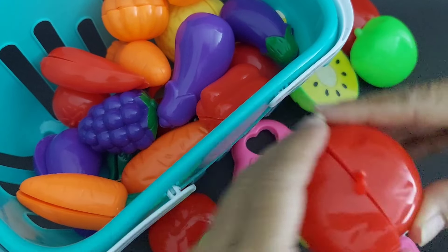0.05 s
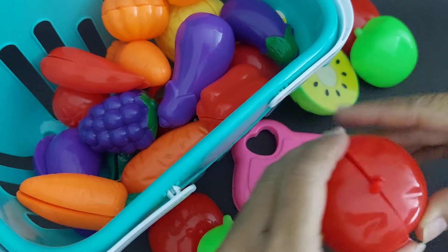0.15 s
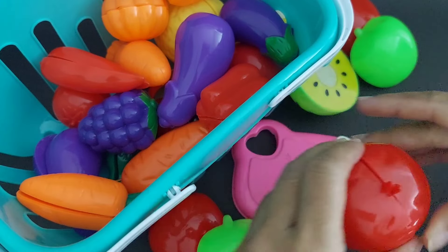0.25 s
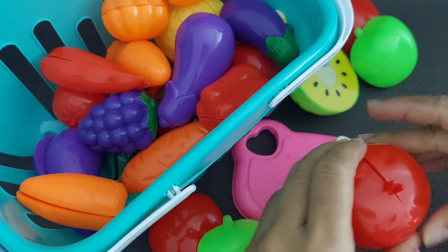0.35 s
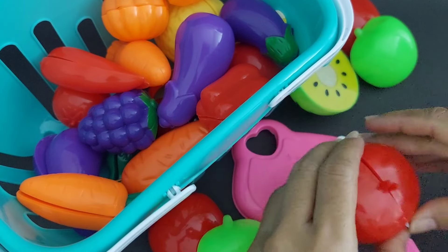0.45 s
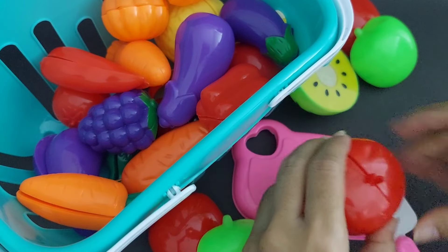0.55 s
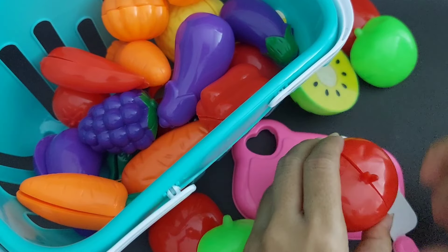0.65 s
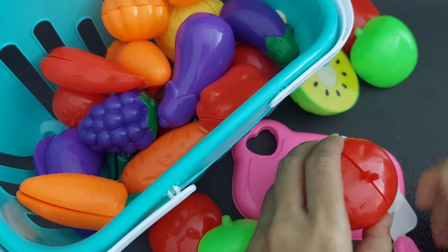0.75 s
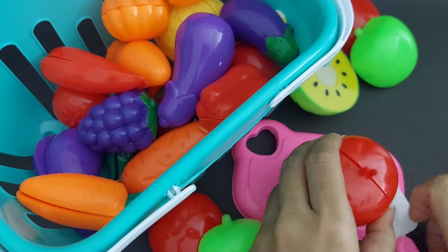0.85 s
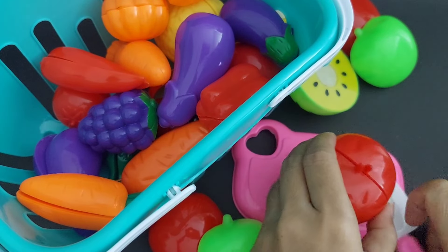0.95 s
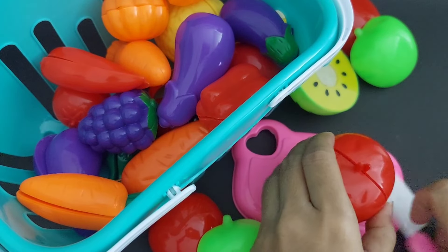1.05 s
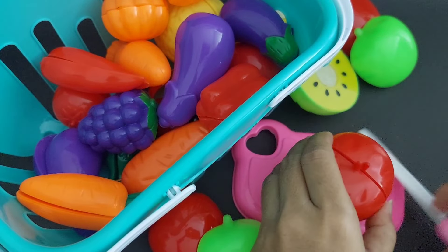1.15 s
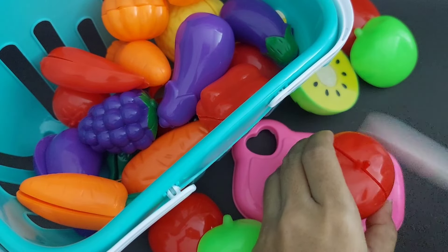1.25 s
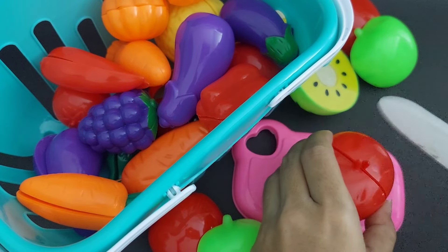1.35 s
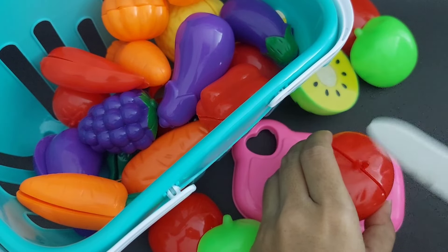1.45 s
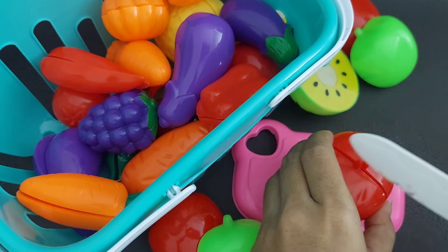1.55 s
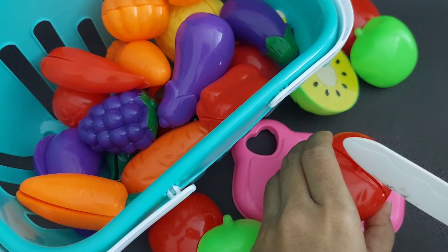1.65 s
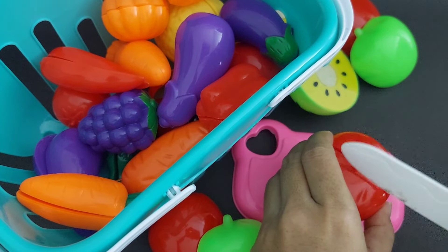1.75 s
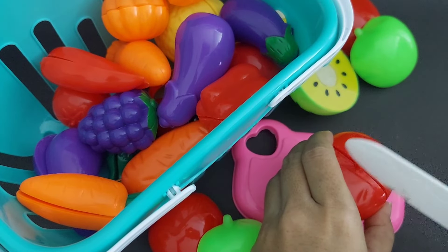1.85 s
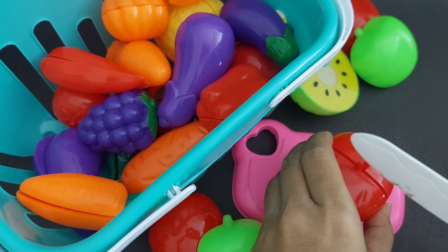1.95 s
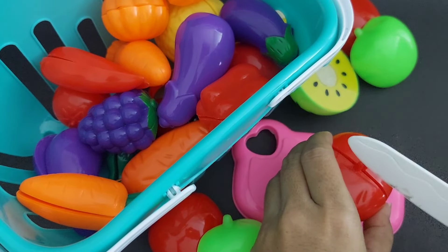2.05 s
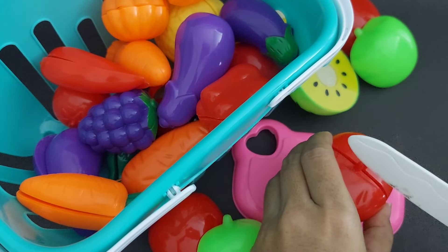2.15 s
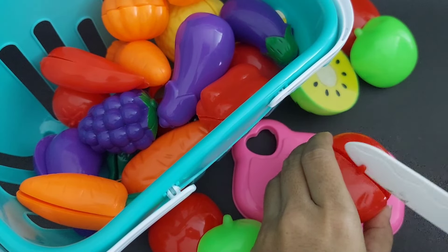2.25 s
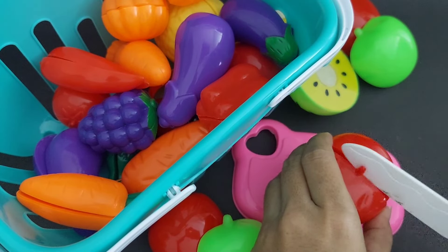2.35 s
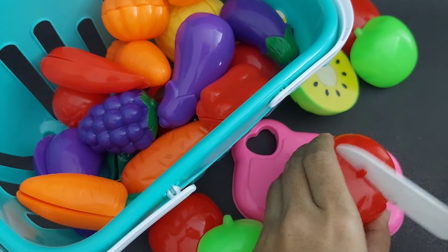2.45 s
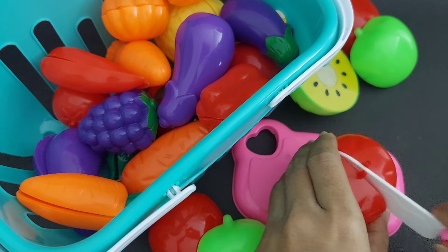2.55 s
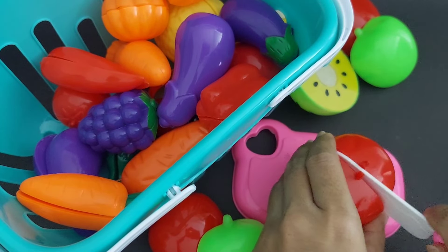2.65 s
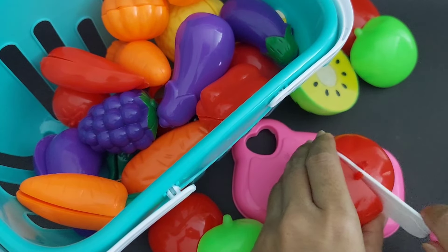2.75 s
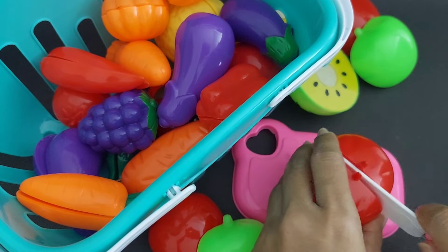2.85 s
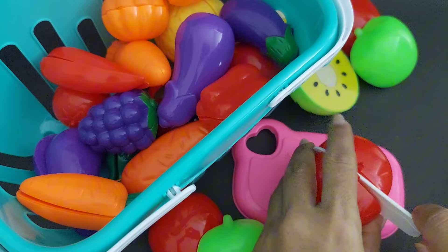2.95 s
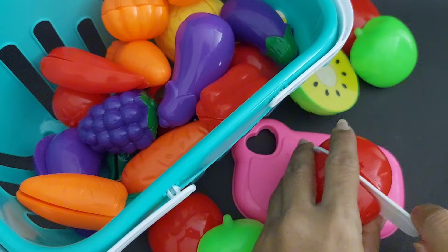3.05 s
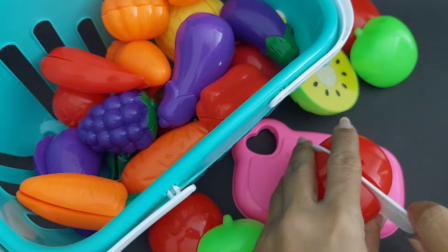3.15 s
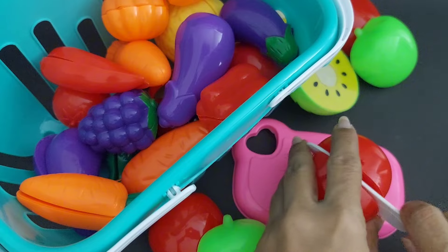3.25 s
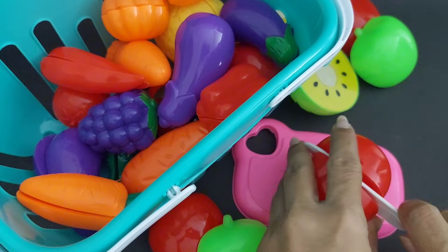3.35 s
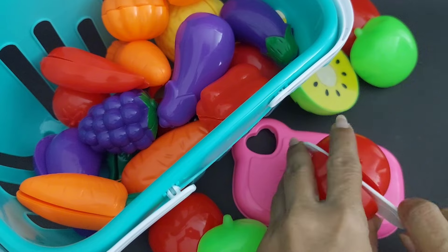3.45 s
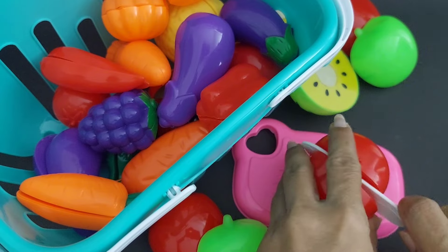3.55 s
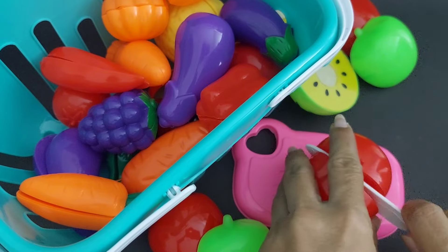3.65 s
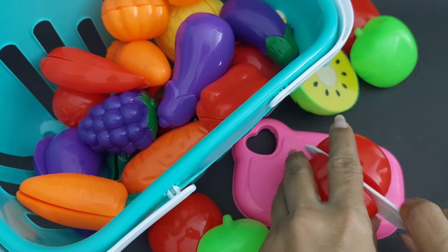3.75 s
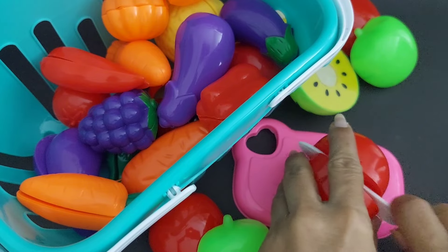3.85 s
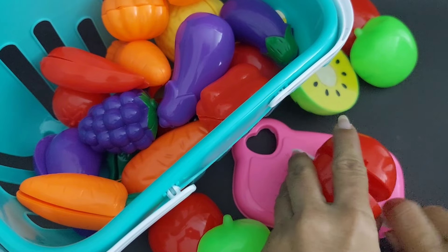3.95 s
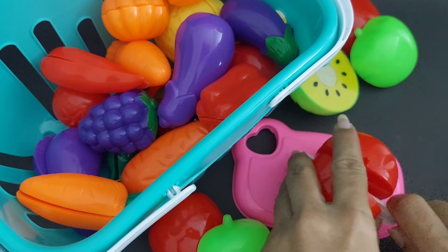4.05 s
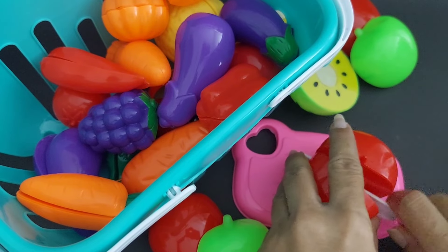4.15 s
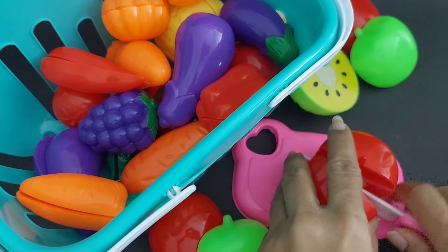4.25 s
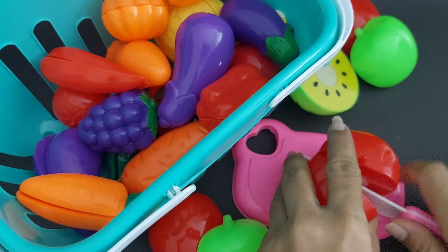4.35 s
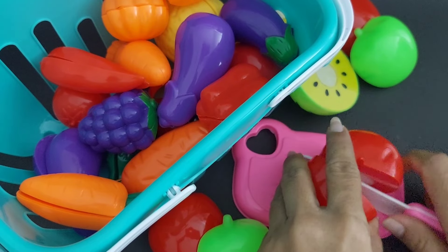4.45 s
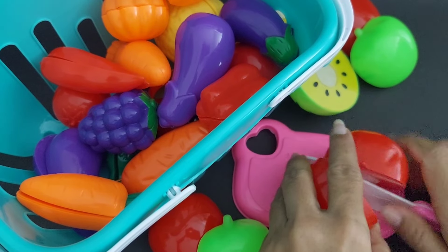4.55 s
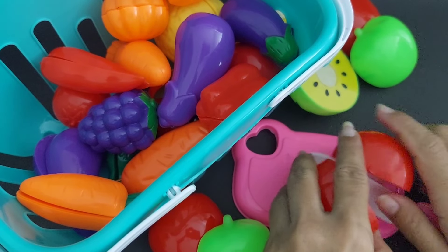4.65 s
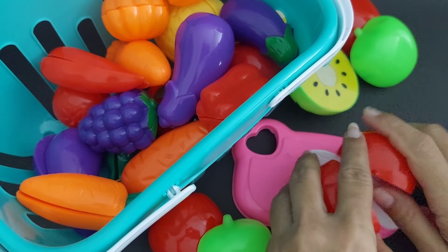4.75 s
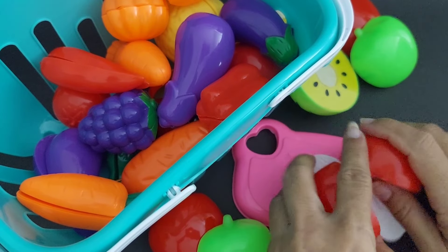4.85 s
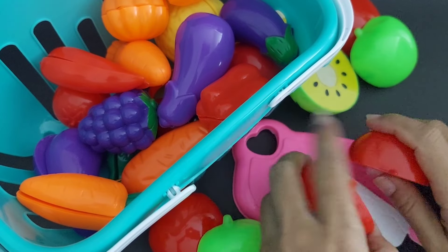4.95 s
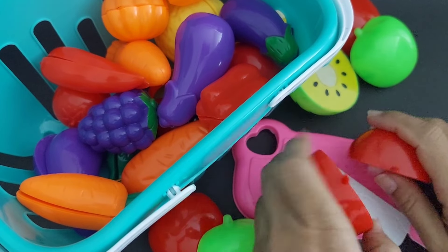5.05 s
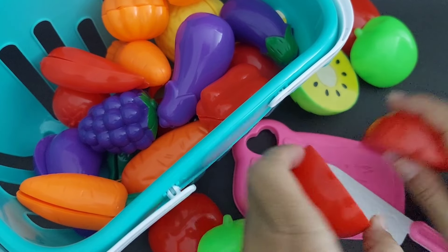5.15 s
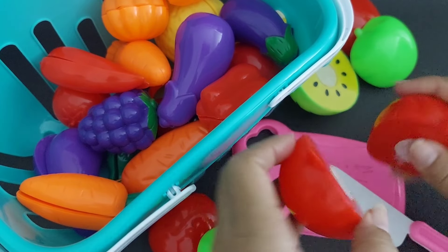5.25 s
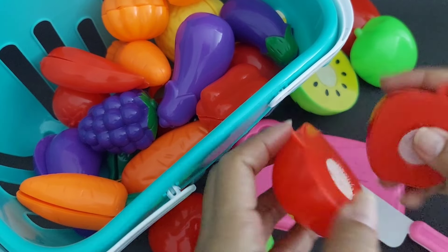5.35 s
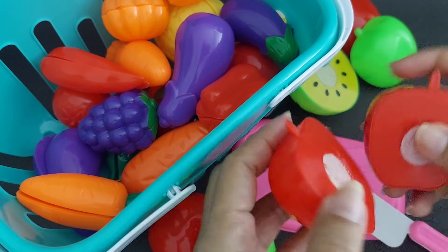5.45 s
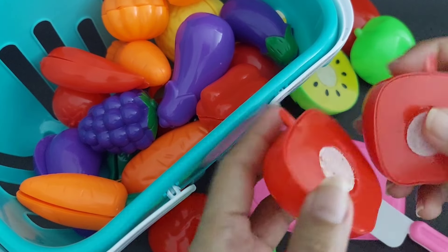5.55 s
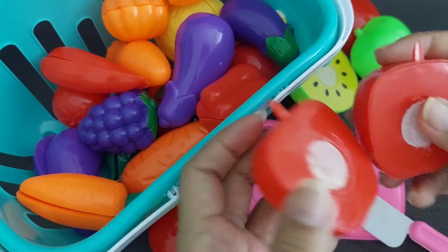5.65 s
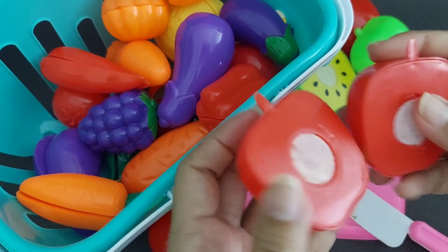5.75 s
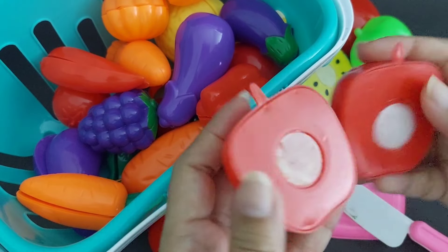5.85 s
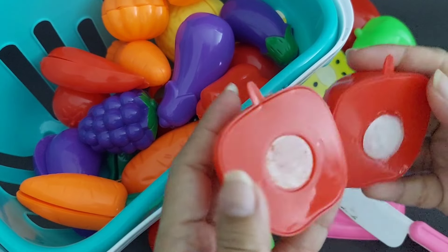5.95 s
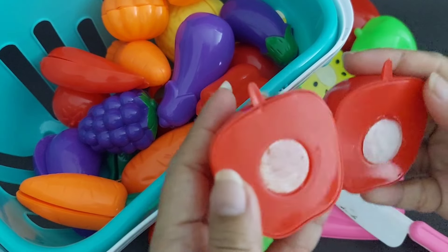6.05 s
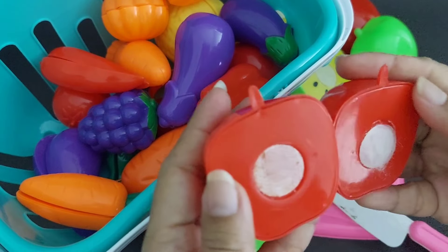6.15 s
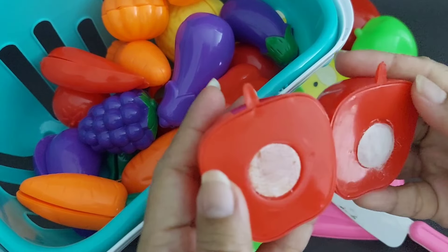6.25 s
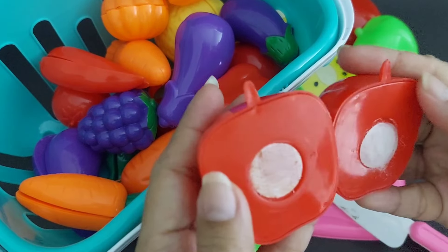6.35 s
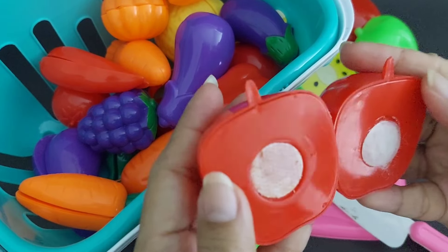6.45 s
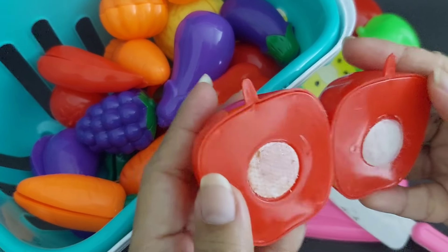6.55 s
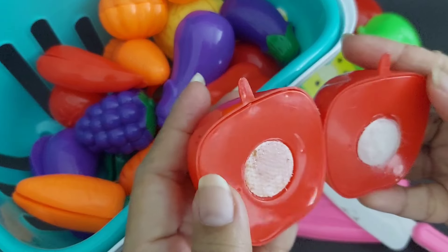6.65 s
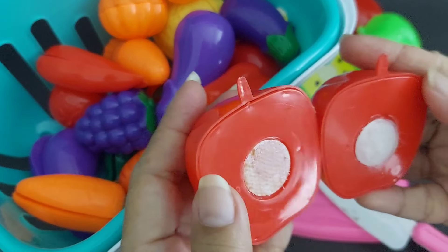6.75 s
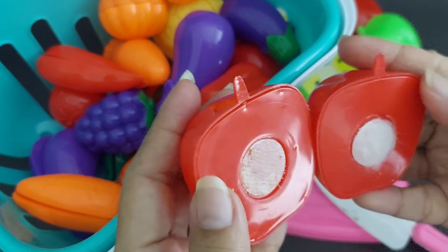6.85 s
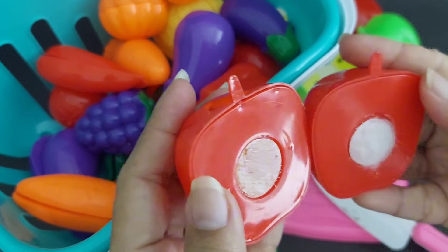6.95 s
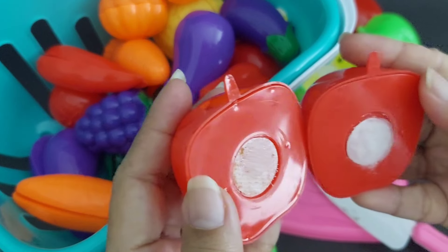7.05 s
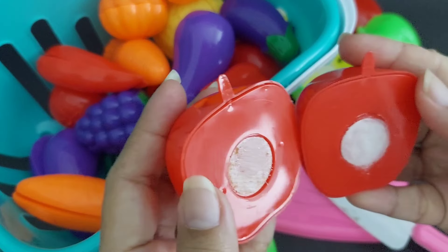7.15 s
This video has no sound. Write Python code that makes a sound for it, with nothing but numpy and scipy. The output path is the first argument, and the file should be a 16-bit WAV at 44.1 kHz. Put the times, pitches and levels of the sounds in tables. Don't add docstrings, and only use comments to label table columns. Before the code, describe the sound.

Light plastic ticks come first, followed by quiet knocks and soft rubs as a plastic blade is placed on a toy fruit. Dry snaps thicken into crackling and a short fierce rip, shaking the plastic board and table. The separated shells scrape with a falling hollow tone and clack twice, then only faint brushing, rumble and hiss remain. Heard close up in a small bare room.

```python
import sys
import numpy as np
from scipy import signal
from scipy.fft import rfft, irfft
from scipy.io import wavfile

SR = 44100
rng = np.random.default_rng(int(sys.argv[2]) if len(sys.argv) > 2 else 0)


def digitize_waveform(pressure):
    field = np.atleast_2d(pressure).T
    bounded = np.clip(field, -1, 1)
    quanta = np.round(bounded * 32767).astype(np.int16)
    wavfile.write(sys.argv[1], SR, quanta)


def volts_from_decibels(level):
    exponent = np.asarray(level, float) / 20
    return 10 ** exponent


N = 317512


def in_time(rows):
    s, *columns = np.transpose(rows)
    t = np.arange(N) / SR
    return np.array([np.interp(t, s, c, left=-150, right=-150) for c in columns])


def rms_one(x):
    return x / np.sqrt(np.mean(x ** 2) + 1e-20)


def wobble(hz):
    return rms_one(signal.sosfilt(signal.butter(2, hz, fs=SR, output="sos"), rng.standard_normal(N)))


def coloured(spectrum, alike):
    mid, side = rng.standard_normal((2, N))
    both = np.sqrt(1 + alike) * mid + np.sqrt(1 - alike) * side * [[1], [-1]]
    hz, level_db = np.transpose(spectrum)
    log_hz = np.log(np.fft.rfftfreq(N, 1 / SR) + 1)
    shape = volts_from_decibels(np.interp(log_hz, np.log(hz), level_db, left=-150, right=-150))
    return rms_one(irfft(rfft(both) * shape, N))


def bursts(times, gains, decay_s):
    marks = np.full((2, N), 1e-18)
    marks[:, np.round(np.array(times) * SR).astype(int)] = gains
    return signal.lfilter([1], [1, -np.exp(-1 / (decay_s * SR))], marks)


def swells(rows, longest_s):
    t = np.arange(0, N + 32, 32) / SR
    out = []
    for s, rise_s, fall_s, db, _ in rows:
        corners_s = [s - abs(rise_s), s, s + 5 * abs(fall_s)]
        out.append(np.interp(t, corners_s, [db - 14, db, db - 100], left=-150))
    return np.where(t > np.array(rows)[:, :1] + longest_s, -150, out)


def fine(coarse):
    return np.interp(np.arange(N) / 32, np.arange(len(coarse)), coarse)


def share(rows, kind):
    hollow_db = np.array(rows)[:, -1]
    wall_db, wall_share, pad_db, pad_share = kind
    return np.array([hollow_db, wall_db + wall_share * hollow_db, pad_db + pad_share * hollow_db, 0 * hollow_db])


# (start t/s, end t/s)
PAD_GIVES = (3.86, 3.92)


def body(x, modes, patchy_db=0):
    out, power = 0, 0
    apart = np.interp(np.arange(N) / SR, PAD_GIVES, [0, 1])
    for k, (hz, width_hz, level_db, apart_db) in enumerate(modes):
        r = np.exp(-np.pi * width_hz / SR)
        a = [1, -2 * r * np.cos(2 * np.pi * hz / SR), r * r]
        b = (1 - r * r) / 2 * np.array([1, 0, -1])
        wander = np.interp(np.arange(N), np.arange(0, N + 1200, 1200), rng.standard_normal(N // 1200 + 2))
        struck = x * volts_from_decibels(level_db + apart * (apart_db - level_db) + patchy_db * wander) + 1e-18
        out = out + (-1) ** k * signal.lfilter(b, a, struck)
        power += volts_from_decibels(level_db) ** 2 * np.pi * width_hz / SR
    return out / np.sqrt(power)


def scrapes(rows, width_hz, alike):
    longest_s = 0.28
    swing = signal.sosfilt(signal.butter(2, width_hz / 2, fs=SR, output="sos"), rng.standard_normal((2, 2, N)))
    one, other = rms_one(swing[0]) + 1j * rms_one(swing[1])
    both, out = np.array([one, alike * one + (1 - alike) * other]), np.zeros((2, N))
    for row, level_db in zip(rows, swells(rows, longest_s)):
        a = max(int((row[0] - abs(row[1])) * SR) - 64, 0)
        b = min(int((row[0] + longest_s) * SR) + 64, N)
        tone = np.exp(2j * np.pi * row[-1] * np.arange(a, b) / SR)
        out[:, a:b] += volts_from_decibels(fine(level_db)[a:b]) * np.real(both[:, a:b] * tone)
    return out


# (f/Hz, level/dB per Hz)
RUMBLE_SPECTRUM = [(15, -66), (25, -36.5), (48, -23.5), (70, -4), (135, 0.5), (200, -12.5), (229, -12.5),
                   (257, -18.5), (287, -16), (390, -29), (700, -40), (910, -69), (1540, -120)]
# (t/s, level/dB, left over right
# level/dB)
RUMBLE_LEVEL = [(0.0, -65.5, 7), (1.6, -68.5, 8.5), (2.26, -65.5, 7), (2.42, -65.5, 9), (3.83, -65, 3.5),
                (4.02, -63, 2.4), (4.33, -73, 8), (4.91, -60.5, 8), (5.31, -71.5, 8.5), (6.1, -69.5, 9),
                (7.2, -71.5, 7.5)]
# (f/Hz, level/dB per Hz)
HISS_SPECTRUM = [(290, -32.5), (500, -5), (960, -6.5), (1320, -8.5), (1420, -8.5), (1770, -10.5),
                 (4730, -18.5), (5470, -17), (7860, -5.5), (8700, -15), (10500, -15.5), (13800, -23),
                 (16900, -21.5)]


def floor():
    level_db, left_db = in_time(RUMBLE_LEVEL)
    lumps = volts_from_decibels(level_db + 3.0 + 0.74 * wobble(6))
    rumble = coloured(RUMBLE_SPECTRUM, alike=0.6) * lumps * volts_from_decibels(left_db * [[.5], [-.5]])
    hiss = volts_from_decibels(-81.5) * coloured(HISS_SPECTRUM, alike=0.072) * volts_from_decibels([[1.5], [-1.5]])
    return rumble + hiss


# (t/s, crack level/dB, shell above crack level/dB)
FINGER_TICKS = [(0.154, -40, -9.5), (0.17, -49.5, -9), (0.222, -41.5, -6), (0.241, -65, 1),
                (0.269, -47.5, -4), (0.545, -61.5, -2)]
BLADE_TICKS = [(1.167, -62.5, -11), (1.7, -62, 0), (1.946, -70, -12), (2.271, -38, 0), (2.522, -47, 15.5),
               (2.65, -48, 13), (3.579, -40.5, 3.5)]
KNOCKS = [(0.884, -52.5, 8.6), (0.894, -63.5, 25.8), (1.013, -50.5, 9.8), (1.061, -67, 27),
          (1.084, -64, 27), (1.621, -57, 10.7), (2.035, -83.5, 25.4), (2.08, -61.5, 17.3),
          (2.385, -69, 21.5)]
FIRST_HOOKS = [(2.592, -40, 1), (2.627, -53.5, 11.5), (2.746, -40, 3.5), (2.782, -41.5, 0), (2.798, -40, 8),
               (2.815, -46.5, 14.5), (2.832, -52.5, 8), (2.884, -43.5, -23), (2.926, -47, -4),
               (2.936, -44, -1), (3.017, -40.5, -4), (3.089, -42.5, -12), (3.098, -46.5, 0),
               (3.124, -41, -2.5)]
TORN_HOOKS = [(3.164, -32.5, -2), (3.184, -29, 5.5), (3.204, -46, 8.5), (3.216, -44.5, 6.5),
              (3.257, -32.5, 3.5), (3.272, -33.5, 4), (3.277, -41, 1), (3.284, -42.5, 10.5),
              (3.297, -40.5, 4), (3.303, -43, 4), (3.315, -44, 3), (3.321, -32, 7), (3.328, -30, 10.5),
              (3.353, -47.5, 7.5), (3.37, -39, 2), (3.51, -49, 4.5), (3.5178, -38, 5.5), (3.529, -38.5, 5),
              (3.692, -42.5, 10.5), (3.722, -48.5, 13), (3.793, -33.5, 7), (3.85, -30.5, 9.5),
              (3.865, -46, 9), (3.8768, -28, 12), (3.885, -36.5, 9.5), (3.891, -37, 13), (3.895, -37, 11),
              (3.8982, -30.5, 8), (3.908, -32.5, 11.5), (3.9115, -31.5, 11.5), (3.924, -33, 13.5),
              (3.9275, -32.5, 10.5), (3.9389, -28, 7), (3.952, -31, 9), (3.963, -33, 7.5),
              (3.9475, -29, 4.5), (3.9565, -29.5, 4.5)]
HALVES_CLACK = [(4.4755, -60, 20), (4.7442, -66, 29), (4.7745, -60, 26), (4.7612, -52.5, 34),
                (4.787, -63.5, 28), (4.929, -59.5, 22), (4.9602, -23.5, 11), (4.975, -41.5, 15),
                (4.994, -48, 22), (5.004, -50.5, 15), (5.012, -52, 17.5), (5.034, -53.5, 5)]
# (wall level/dB, wall share of hollowness, pad level/dB, pad share)
FINGER = (-11, -0.4, -13, -1)
BLADE = (-14.5, 0.6, 4.5, 0.28)
KNOCK = (-10, 0.47, -13.5, 0.63)
HOOK = (0.2, 0.27, 1.5, 0.17)
CLACK = (-2.5, .5, -9, 0.4978)


def contacts():
    kinds = [(FINGER_TICKS, FINGER), (BLADE_TICKS, BLADE), (KNOCKS, KNOCK),
             (HALVES_CLACK, CLACK), (FIRST_HOOKS, HOOK), (TORN_HOOKS, HOOK)]
    s, crack_db, _ = np.vstack([rows for rows, kind in kinds]).T
    return s, crack_db + np.hstack([share(rows, kind) for rows, kind in kinds])


# (peak t/s, rise t/s, fall t/s per 20 dB, crack level/dB, shell above it level/dB)
RUBS = [(0.002, 0.0018, -0.07, -64.5, 6), (0.269, 0.035, -0.15, -51.5, 0), (0.896, .006, 0.18, -69.5, 18.5),
        (0.96, .06, 0.46, -65, 1.5), (1.03, 0.047, 0.17, -57.5, 4.5), (1.099, 0.03, 0, -61, 16),
        (1.957, .24, 0, -73, -6), (2.087, 0.061, -7, -85, 11.5), (2.266, .017, 0.18, -57, -5),
        (2.35, .05, 0.07, -59.5, 6), (2.39, .02, .05, -63, 9), (2.551, 0.031, 0, -63, 11),
        (2.649, 0.062, 0.06, -45, 6), (2.82, 0.05, 0.01, -48.5, 7.5), (2.93, .05, 0.25, -60, 6),
        (3.157, 0.078, 0.3, -62, -5), (3.272, .02, 0.05, -43, 0), (3.325, .014, 0.056, -41, 2.5),
        (3.56, .045, 1.03, -62, 2.5), (3.845, .028, 0.15, -53, 15), (4.705, .224, 0.12, -72, 21),
        (4.75, 0.039, 0.1136, -66.5, 29), (4.97, .008, .09, -44, 3), (5.001, 0.02, 0.05, -51, 13)]
# (peak t/s, rise t/s, fall t/s per 20 dB, crack level/dB, shell above it level/dB)
BRUSHES = [(0.085, 0.1, 0.3, -61, -12), (.93, .04, .2, -64, -8), (1.11, .05, .15, -63, -8),
           (1.248, 0.085, 0.25, -66, -14), (4.5, 0.034, 0.3, -71, 0), (4.76, .1, 0.48, -67, 0),
           (3.475, .02, 0.76, -58.5, -13), (5.308, 0.12, 0.1, -60.5, -12), (5.45, 0.16, 0.75, -74.5, -23.5),
           (5.6, .06, 0.9, -76, -26), (5.82, 0.039, 0.06, -58.5, -19), (5.89, .04, 0.4, -77, -19),
           (6.09, 0.032, 0.64, -77, -7.5)]
# (wall level/dB, wall share of hollowness, pad level/dB, pad share)
RUB = (-3.5, 0.74, -3.5, 0.4627)
BRUSH = (-3, 0.9, -4, 0.5)
# (t/s, crack level/dB)
RIP = [
    (3.878, -50),
    (3.9, -39.5),
    (3.92, -36),
    (3.93, -31.5),
    (3.945, -29.5),
    (3.961, -31),
    (3.968, -46),
    (4.05, -62),
]


def friction(s, levels_db):
    swollen = swells(RUBS + BRUSHES, N / SR)
    shares = np.hstack([share(RUBS, RUB), share(BRUSHES, BRUSH)])
    bed = []
    for part, db in zip(shares, levels_db):
        rubbing = volts_from_decibels(fine(np.max(swollen + part[:, None], axis=0)))
        settle = bursts(s, volts_from_decibels(db - 17.5), 0.016)[0]
        lead_in = bursts((N - 1) / SR - s, volts_from_decibels(db - 22.5), 0.0046)[0, ::-1]
        bed.append(rubbing + settle + lead_in)
    rip_db = in_time(RIP)[0] + share([[7.5]], RUB)
    return np.array(bed) + volts_from_decibels(rip_db)


def hook_slips(crack):
    per_s = (250 + 6000 * volts_from_decibels(26.0) * crack) * volts_from_decibels(2.2 * wobble(34))
    slips = (rng.random(N) < per_s / SR) * volts_from_decibels(2.76 * np.minimum(rng.exponential(1, N), 3))
    slips = (signal.lfilter([1], [1, -.982], slips) + .6) / (1 + per_s / 500)
    grain = crack / (crack + volts_from_decibels(-55.5))
    return grain * slips + (1 - grain) * 0.8


# (f/Hz, width f/Hz, joined level/dB, once apart level/dB)
SHELL = [(300, 110, -20, -16), (460, 90, -17, -14.5), (665, 130, -4.5, -2.5), (830, 200, -1.5, -0.5),
         (1010, 250, 0.5, 0.4), (1200, 250, 0.6, 0.5), (1420, 220, 0.8, -4)]
WALL = [(1694, 260, -11.5, -7), (1910, 400, -2.5, -2.5), (2286, 320, -1, -0.5), (2796, 490, -6, -7)]
PAD = [(3910, 600, -3.5, -3.5), (4450, 420, 4, -0.5), (5174, 1400, -6.5, -6)]
CRACK = [(7136, 1600, -1.2, -0.76), (9660, 1300, 0.3, 0.065), (12145, 2500, 0.51, 0.99),
         (16070, 1800, 0.33, 0.21)]


def fruit():
    s, levels_db = contacts()
    bed = friction(s, levels_db)
    slips = hook_slips(bed[3])
    white = rng.standard_normal((2, 2, N))
    # modes, decay in s, left-right likeness, snap dB, left over right dB, first kick
    parts = [(SHELL, .0008, .72, 4.2, -1.8, 6.5), (WALL, .001, .68, 3.2, -.8, 4.5),
             (PAD, .0012, .25, 5.5, -4.2, 3.0), (CRACK, .0014, .2, 3.5, -2.2, 1.8)]
    out = 0
    for k, (modes, decay_s, alike, snap_db, left_db, kick) in enumerate(parts):
        chatter, other = white[k % 2]
        chatter = chatter.copy()
        chatter[np.round(s * SR).astype(int)] = kick
        noise = np.array([chatter, alike * chatter + np.sqrt(1 - alike ** 2) * other])
        noise = noise * volts_from_decibels([[left_db / 2], [-left_db / 2]])
        snaps = bursts(s, volts_from_decibels(levels_db[k] + snap_db), decay_s)
        rustle = volts_from_decibels(-0.5) * bed[k] * slips
        ringing = body(noise * (snaps + rustle), modes, patchy_db=2.5)
        top_hz = min(1.5 * modes[-1][0], 20000)
        out = out + signal.sosfilt(signal.butter(3, top_hz, fs=SR, output="sos"), ringing)
    return out


# (f/Hz, 60 dB decay t/s, level/dB)
ROOM = [(153, 0.32, -4.5), (600, 0.36, -3.5), (1299, 0.48, -6.5), (2479, 0.49, -5), (4367, 0.5, -7.5),
        (6960, 0.47, -4), (10004, 0.37, -5), (13480, 0.44, -6.5)]


def room(x):
    t = np.arange(round(.7 * SR)) / SR
    centres = np.array(ROOM)[:, 0]
    edges = np.r_[60, np.sqrt(centres[1:] * centres[:-1]), 19000]
    tail = 0
    for (hz, t60, level_db), low, high in zip(ROOM, edges, edges[1:]):
        band_pass = signal.butter(2, [low, high], "band", fs=SR, output="sos")
        band = signal.sosfilt(band_pass, rng.standard_normal((2, len(t))))
        band[1] += np.clip(1 - hz / 500, 0, 1) * (band[0] - band[1])
        fade = volts_from_decibels(-60 * t / t60) * np.clip((t - .003) / 0.0043, 0, 1)
        tail = tail + volts_from_decibels(level_db) * band * fade / np.sqrt(np.sum(fade ** 2))
    return signal.fftconvolve(np.mean(x, axis=0)[None], tail, axes=1)[:, :N]


# (peak t/s, rise t/s, fall t/s per 20 dB, level/dB, f/Hz)
SWISHES = [(0.2225, 0.0028, 0.016, -44, 4230), (0.2715, 0.009, 0.014, -48, 4250),
           (.294, .028, 0.011, -56.5, 4220), (.11, .05, 0.065, -65.5, 4270), (1.105, .032, .065, -67, 5000),
           (1.172, 0.013, .045, -64, 5150), (1.248, 0.037, 0.066, -64, 5050),
           (1.378, .034, 0.069, -78, 4840), (1.102, 0.046, 0.13, -65.5, 2520),
           (1.917, .03, .035, -71.5, 2840), (1.928, 0.054, .042, -73, 4390), (1.79, .052, .11, -77, 4340),
           (1.918, 0.03, .042, -70.5, 7490), (2.275, .004, 0.033, -47, 4460), (2.35, .04, .05, -57, 4520),
           (2.655, 0.047, 0.057, -47, 4370), (3.3, 0.048, 0.062, -45.5, 4504),
           (5.826, .026, .042, -73, 5630)]


def swishes():
    return volts_from_decibels(-0.4) * scrapes(SWISHES, width_hz=600, alike=0.13) * volts_from_decibels([[-1.5], [1.5]])


# (peak t/s, rise t/s, fall t/s per 20 dB, level/dB, f/Hz)
BOARD = [
    (0.64, 0.015, 1.2, -73.5, 408),
    (3.914, 0.027, -0.05, -29.5, 395),
    (3.951, 0.032, 0.15, -27.5, 770),
    (4.49, 0.011, .4, -54, 547),
    (5.011, 0.053, 0.09, -44.5, 847.5),
    (6.791, 0.03, -0.1, -82, 808),
    (6.101, 0.022, -0.2, -82, 546),
]


def board():
    return volts_from_decibels(-1.1) * scrapes(BOARD, width_hz=310, alike=0.86) * volts_from_decibels([[-.8], [.8]])


# (t/s, deep modes level/dB, top modes level/dB)
THUDS = [(0.9, -64, -53), (2.316, -50.5, -51.5), (2.369, -59, -56), (2.532, -44.5, -47),
         (2.665, -55.5, -52), (3.333, -54, -41.5), (3.9, -39, -35), (3.929, -46, -28), (3.99, -60, -33),
         (4.504, -48.5, -40), (4.769, -65, -45.5), (4.964, -45, -37), (4.997, -45, -41),
         (5.903, -50.5, -65)]
# (f/Hz, width f/Hz, joined level/dB, once apart level/dB)
TABLE_DEEP = [(66.5, 9.3, -4, -3.5), (88, 17, 0.5, 0.8)]
TABLE_TOP = [(128, 9.1, -5, -2.5), (156.8, 4.1, 2, 2.5), (237.7, 60, -16.5, -17)]


def table():
    s, deep_db, top_db = np.transpose(THUDS)
    shake, out = rng.standard_normal(N), 0
    for modes, level_db in [(TABLE_DEEP, deep_db), (TABLE_TOP, top_db)]:
        rattle = signal.lfilter([.004], [1, -.996], bursts(s, volts_from_decibels(level_db - 2), 0.023)) * shake
        push = bursts(s + .006, volts_from_decibels(level_db - 4), 0.00088)
        out = out + body(rattle + push, modes)
    low_band = signal.butter(2, [45, 260], "band", fs=SR, output="sos")
    return signal.sosfilt(low_band, out) * volts_from_decibels([[.6], [-.6]])


# (peak t/s, rise t/s, fall t/s per 20 dB, level/dB, f/Hz)
SLIDES = [(1.092, .05, .048, -53.5, 1080), (1.623, .003, .04, -54, 1200), (4.7625, .002, .012, -22, 1120),
          (4.746, .006, .012, -32, 1250), (2.038, .0035, .095, -65.5, 1207), (4.477, .003, .008, -42, 1450),
          (4.93, .006, .009, -32, 1110), (4.9625, .0025, .013, -22, 1155), (4.997, .013, .072, -35.5, 1055),
          (5.821, .032, .03, -74.5, 1705), (6.791, .036, .042, -80.5, 1405)]


def slides():
    return volts_from_decibels(0.7) * scrapes(SLIDES, width_hz=336, alike=0.44) * volts_from_decibels([[-.8], [.8]])


# (t/s, level/dB, f/Hz)
PARTING = [
    (4.485, -62, 1399),
    (4.6, -50, 1285),
    (4.685, -38, 1203),
    (4.735, -37, 1170),
    (4.746, -29, 1154),
    (4.764, -24.5, 1150),
    (4.79, -49.5, 1120),
    (4.84, -56.5, 1100),
    (4.92, -66, 1093),
]


def parting():
    level_db, hz = in_time(PARTING)
    alike = 0.32
    narrow = signal.butter(2, 270 / 2, fs=SR, output="sos")
    swing = signal.sosfilt(narrow, rng.standard_normal((2, 2, N)))
    one, other = np.real((swing[0] + 1j * swing[1]) * np.exp(2j * np.pi * np.cumsum(hz) / SR))
    both = rms_one(np.array([one, alike * one + (1 - alike) * other]))
    return volts_from_decibels(level_db - 2.5) * both * volts_from_decibels([[-.8], [.8]])


# (t/s, left over right level/dB)
HANDS = [(0.0, -4), (0.04, -4.5), (0.76, -2), (1.38, -7), (1.54, -2), (1.94, -8), (2.17, -1), (2.26, -5),
         (2.32, -2), (2.69, -3.5), (5.9, -3), (7.2, 0.5)]


def scene():
    toy = fruit() + swishes() + board() + slides() + parting()
    near = toy * volts_from_decibels((in_time(HANDS) + 1.0) * [[.5], [-.5]]) + table()
    return floor() + near + room(near)


def band_limit(x):
    return signal.sosfilt(signal.butter(12, 16700, fs=SR, output="sos"), x)


def record(dry):
    rounded = 0.89 * np.tanh(dry / 0.91)
    mix = signal.sosfilt(signal.cheby2(6, 24, 16150, fs=SR, output="sos"), rounded)
    return band_limit(mix)


dry = scene()
out = record(dry)
digitize_waveform(out)
```